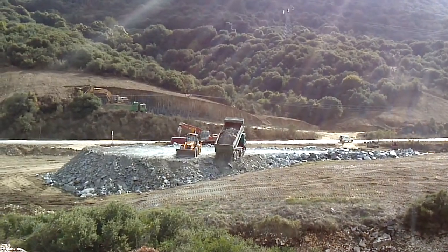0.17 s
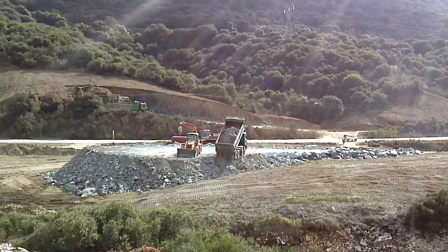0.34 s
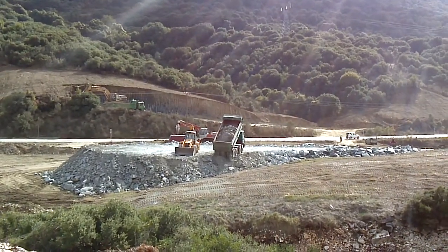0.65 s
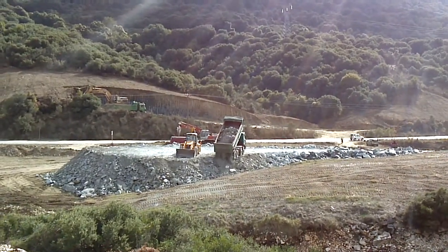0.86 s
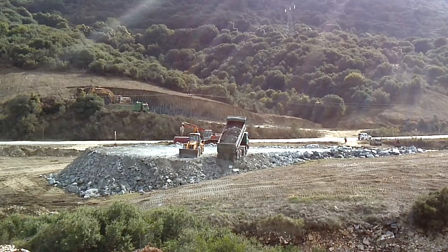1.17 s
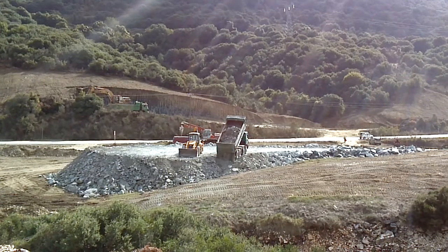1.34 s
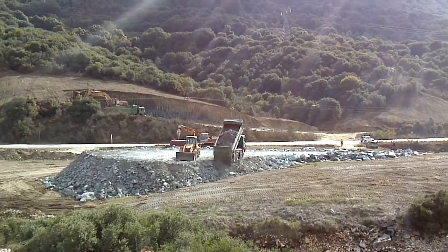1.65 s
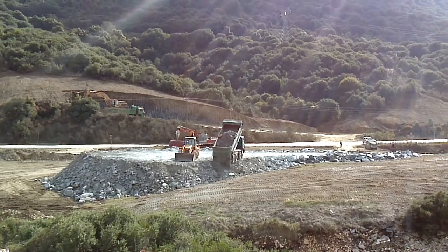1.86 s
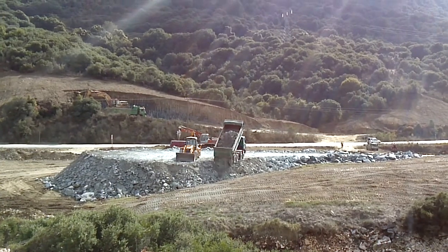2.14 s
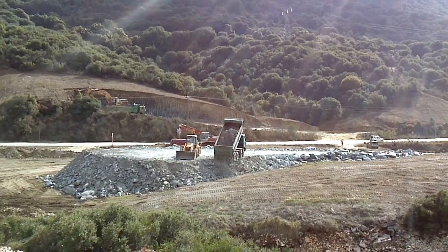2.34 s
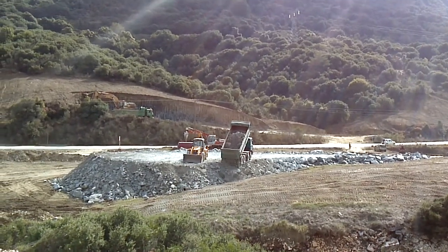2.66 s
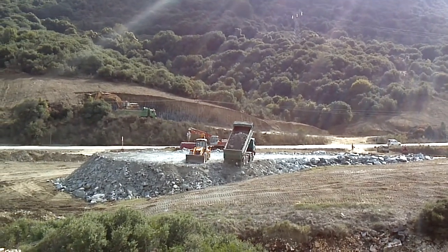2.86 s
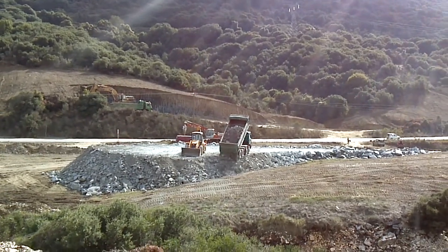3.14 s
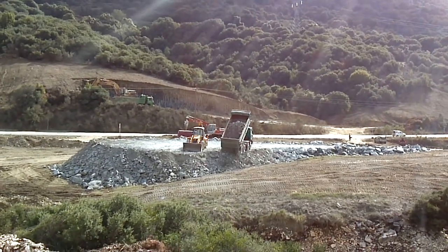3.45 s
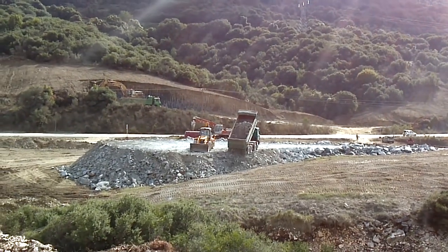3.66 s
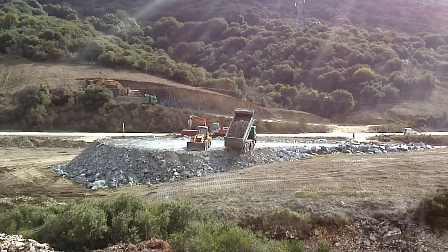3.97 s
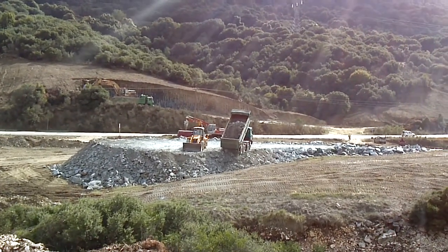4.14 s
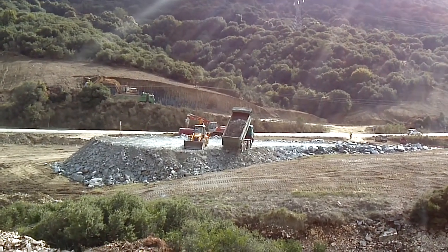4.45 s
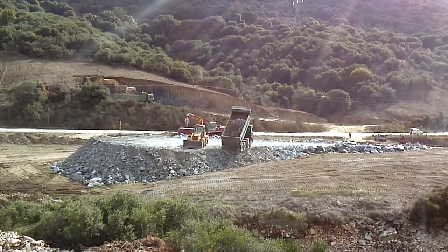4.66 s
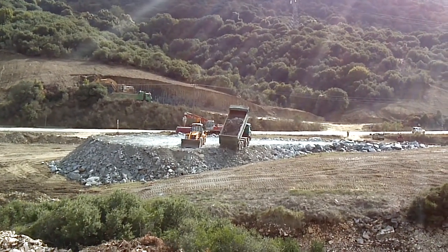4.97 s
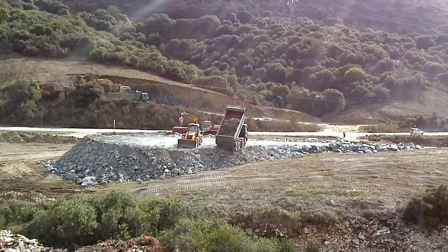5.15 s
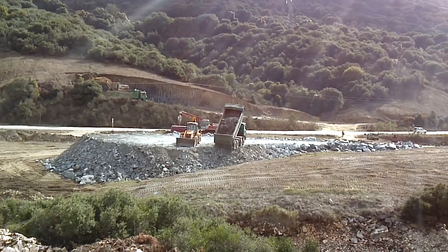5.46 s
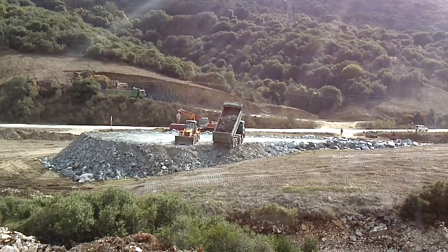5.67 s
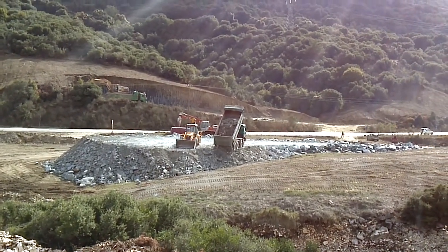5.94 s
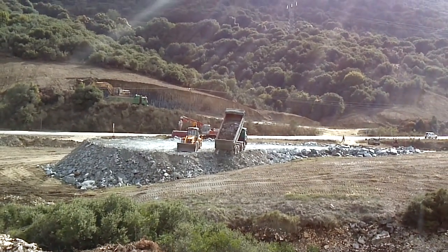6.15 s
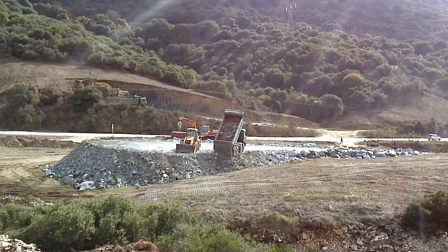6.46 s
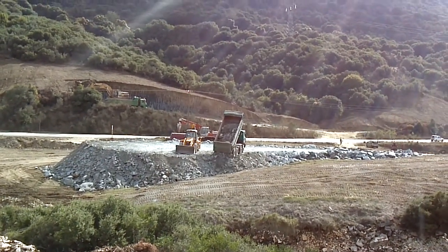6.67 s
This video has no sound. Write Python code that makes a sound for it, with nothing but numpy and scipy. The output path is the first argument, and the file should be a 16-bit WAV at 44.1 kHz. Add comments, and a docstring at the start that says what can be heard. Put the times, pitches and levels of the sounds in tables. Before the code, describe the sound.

Rocks tumble out of a steel truck bed with dull thumps, clanks and sliding gravel while diesel engines rumble far off.

```python
"""Far across a valley diesel machines drone and clatter, and an engine pulls under load as a dump truck
tips rock. The first boulders land within a second, each impact exciting a thud, a clang of the steel tub
and a crack of stone, while gravel slides between them. After three seconds slabs grind down the tub by
stick-slip friction and blocks thump down; then sharper blows set the panels ringing, up to a last heavy
volley. Throughout, the hillside scatters back a faint echo and the whole sound is dull."""
import sys
import numpy as np
from scipy import signal
from scipy.fft import rfft, irfft, next_fast_len
from scipy.io import wavfile
from scipy.ndimage import map_coordinates

SR = 44100
rng = np.random.default_rng(int(sys.argv[2]) if len(sys.argv) > 2 else 0)


def to_wav(s):
    """Save 16-bit WAV."""
    ch = np.atleast_2d(s).T  # columns
    pcm = np.round(np.clip(ch, -1, 1) * 32767)  # PCM
    wavfile.write(sys.argv[1], SR, pcm.astype(np.int16))


N = 300321

# Steady machine tones, the diesel firing rate first. Each row: frequency in Hz, level in dB.
HUM_TONES = [(91.5, -42.5), (112, -39), (183, -43.5), (940, -61.5), (2223, -64.5)]
# An engine under load. Each row: start and end in seconds, first and last firing rate in Hz, level in dB.
ENGINE_PULLS = [(0, 0.964, 214, 222, -32), (1.178, 1.644, 219, 219.7, -31),
                (5.915, 6.186, 238, 208.5, -26.5)]
# Exhaust harmonics. Each row: multiple of the firing rate, relative level in dB.
EXHAUST_HARMONICS = [(1, 4), (2, -25), (3, -13), (4, -32.5)]
# Envelopes of diesel clatter, deep roar and shifting load. Each row: time in seconds, level in dB.
CLATTER_LEVELS = [(0, -46.5), (1.1, -42.5), (2.2, -44), (3.8, -45), (4.6, -43), (6.81, -41)]
ROAR_LEVELS = [(0, -24.5), (0.7, -29.5), (1.4, -22.5), (2.0, -26), (2.7, -21.5), (3.3, -25), (4.2, -25.5),
               (5.5, -26), (6.2, -25), (6.81, -24.5)]
LOAD_LEVELS = [(0.0, -25), (1.14, -29), (1.56, -28), (1.99, -28), (2.5, -25.5), (5.27, -27.5),
               (6.18, -24.5), (6.81, -22)]
# The treble of the whole sound fades above about 5 kHz. Each row: frequency in Hz, gain in dB.
TREBLE_ROLLOFF = [(4600, 0), (7000, -4.5), (8500, -18.5), (15000, -27)]

# Broad spectra of the sources. Each row: frequency in Hz, relative spectral level in dB.
CLATTER_SPECTRUM = [(500, -19.5), (950, 0.5), (1250, -1), (1500, -2), (1950, -5), (2280, 0.5), (2650, -6.5),
                    (3200, -16), (4200, -13), (4700, -22.5), (5300, -37), (8000, -74.5)]
ROAR_SPECTRUM = [(10, -27), (20, 5.5), (32, 8), (48, 2.5), (65, -1), (100, -10.5), (300, -90.5)]
LOAD_SPECTRUM = [(40, -21), (70, -3.5), (95, 3), (115, -2), (145, -6.5), (190, -3.5), (250, -6.5),
                 (330, -12), (600, -22), (2000, -67.5)]
GRAVEL_SPECTRUM = [(150, -17.5), (300, -4.5), (420, 2), (720, 0), (840, -8), (1100, -8.5), (1450, -18),
                   (2400, -18), (3200, -24), (4400, -28.5), (5300, -47.5), (8000, -83.5)]
PEBBLE_SPECTRUM = [(300, -26.5), (800, -5.5), (1300, -2.5), (1800, -7.5), (2500, 0.5), (3300, -8),
                   (4400, -8.5), (5300, -37), (8000, -54)]
SCRAPE_SPECTRUM = [(110, -24), (230, 1), (450, 0.5), (680, -4), (830, -11), (1050, -6.5), (1400, -22),
                   (2400, -20.5), (4000, -36), (5500, -71)]
THUD_SPECTRUM = [(20, -11.5), (40, 2.5), (70, -1.5), (110, 1.5), (190, -2.5), (260, -9), (360, -14),
                 (700, -40), (2000, -81.5)]
CLANG_SPECTRUM = [(120, -33), (280, -4.5), (420, 2), (680, 1), (830, -5), (1050, -4), (1300, -11),
                  (1600, -15), (3000, -53), (6000, -83)]
CRACK_SPECTRUM = [(600, -27.5), (1300, -7.5), (1700, 8.5), (2500, 8.5), (3200, -2), (4200, -8.5),
                  (4700, -14.5), (5400, -44.5), (8000, -46)]
SNAP_SPECTRUM = [(2000, -26), (6000, 3.5), (7500, -3.5), (9000, -7), (15000, -21.5)]
ECHO_SPECTRUM = [(200, -4.5), (1000, -2.0), (5000, -18.0)]
# A small stone's click. Each row: multiple of its ring frequency, relative spectral level in dB.
CHIP_SPECTRUM = [(.2, -31.5), (0.501, -2), (0.801, -7.5), (1.049, -11), (1.152, -14.5), (1.299, -30),
                 (1.7, -40), (2.401, -73)]
# Resonances of the steel tub. Each row: frequency in Hz, bandwidth in Hz, lift in dB.
TUB_MODES = [(245, 61, 9), (336, 22, 6), (451, 18, 3.5), (498, 5.5, 5.5), (619, 13, 3.5), (720, 12, 6.5),
             (943, 16, 5.5), (1040, 9.5, 7.5), (1145, 34, 4.5), (1270, 49, 4.5), (1623, 20, 6),
             (1884, 17, 3.5), (2278, 65, 8), (2865, 55, 3)]

# Small hard stones on steel. Each row: start in seconds, level in dB, length in seconds,
# snap of the fracture relative to the click in dB.
CHIP_HITS = [(0.379, -39, 0.17, -23.5), (0.586, -40, .07, -35), (0.726, -37, 0.15, -24),
             (1.75, -37, 0.081, -16.5), (2.332, -48.5, 0.052, -10), (2.491, -41.5, .07, -36),
             (3.296, -35, 0.049, -37), (3.389, -41, .07, -35.5), (3.483, -31.5, 0.059, -39.5),
             (3.573, -39, 0.051, -5), (4.774, -28, 0.056, -23.5), (4.875, -36.5, 0.091, -36.5),
             (5.122, -31.5, 0.065, -14.5), (5.62, -45.5, 0.14, -41), (6.277, -44, 0.091, -8),
             (6.541, -30.5, 0.11, -11), (6.581, -36.5, 0.074, -11)]
# Slabs grinding down the tub. Each row: start and length in seconds, level in dB, pitch in Hz.
SLAB_SCRAPES = [(3.07, .22, -28.5, 400), (3.3, .27, -28.5, 460), (3.549, .12, -29.5, 680),
                (6.42, .08, -23.5, 660)]
# Rock corners on panels. Each row: start in seconds, level in dB, pitch in Hz, 60 dB decay in seconds.
PANEL_HITS = [(1.712, -17.5, 618, 0.21), (2.087, -19.5, 610, 0.095), (2.339, -18.5, 609, 0.21),
              (2.427, -23, 620, 0.11), (2.466, -12.5, 179, 0.26), (2.467, -18.5, 515, .2),
              (2.745, -21, 600, 0.19), (3.13, -23.5, 432, .4), (3.35, -25.5, 450.7, 1),
              (3.378, -26, 985, 0.24), (3.487, -15.5, 246, 0.24), (3.487, -29.5, 445, 0.32),
              (3.487, -23.5, 1040, 0.18), (4.78, -19.5, 1021, 0.1), (4.779, -23, 903, 0.18),
              (4.78, -23, 720, 0.19), (4.856, -21.5, 1056, .16), (4.88, -16.5, 718, 0.33),
              (4.88, -20, 896, 0.095), (4.88, -12.5, 544, 0.13), (4.88, -27, 1127, 0.18),
              (5.128, -25, 1620, 0.15), (5.128, -17, 476, 0.15), (5.128, -14.5, 634, 0.098),
              (5.128, -31.5, 2191, .2), (5.128, -27.5, 2865, 0.069), (5.15, -28, 1244, .25),
              (5.607, -14, 690, 0.072), (5.61, -20, 185, 0.32), (5.622, -13.5, 330, 0.11),
              (5.884, -15.5, 264, .13), (5.9, -21.5, 619, 0.27), (5.89, -23.5, 944, .24),
              (6.607, -16.5, 2288, 0.096), (6.607, -25, 2865, 0.062), (6.607, -30, 1884, .12),
              (6.609, -21, 697, 0.2), (6.609, -25.5, 1141, 0.25), (6.609, -16, 338, 0.17)]
# Heavy blocks landing. Each row: start in seconds, level in dB, pitch in Hz.
BLOCK_LANDINGS = [(1.754, -15.5, 160), (2.387, -6, 72), (2.415, -10.5, 95), (2.459, -4, 150),
                  (3.677, -11, 41.6), (3.741, -6, 120), (3.922, -6.5, 70), (3.941, -7, 116),
                  (3.996, -2, 166), (4.025, -16, 148), (4.051, -13, 92), (4.069, -8, 140),
                  (4.262, -13, 130), (5.606, -3.5, 140), (5.648, -9.5, 64.6), (5.986, -9, 65.6),
                  (6.384, -0.5, 135), (6.584, -1, 98), (6.611, 1, 240), (6.625, -6.5, 130),
                  (6.667, -5, 171)]
# Boulders landing. Each row: start in seconds, level in dB, knock pitch in Hz, tumble length in seconds,
# crack relative to the clang in dB, rise time in seconds.
BOULDER_BLOWS = [(0.335, -31.5, 700, .2, -6, .01), (0.372, -23, 1025, 0.24, -13, .009),
                 (0.577, -22.5, 860, 0.25, -12.5, 0.0031), (1.37, -21, 110, 0.22, -7.5, 0.0048),
                 (1.585, -23, 630, 0.14, -30, 0.00046), (1.627, -25, 680, 0.16, -17, 0.0005),
                 (1.63, -21.5, 118, 0.31, -15, 0.027), (1.695, -20, 610, 0.23, -15.5, 0.012),
                 (1.752, -18, 175, .13, -15, 0.0012), (2.082, -27.5, 600, 0.094, -25, 0.002),
                 (2.338, -21, 600, 0.28, -15, 0.0005), (2.385, -20.5, 390, 0.14, -15, .001),
                 (2.424, -17, 620, .13, -16, 0.001), (2.462, -12.5, 235, 0.17, -14, 0.0005),
                 (2.575, -20, 199, 0.42, -12, 0.034), (2.674, -12, 205, 0.34, -11, 0.0053),
                 (2.69, -14.5, 330, 0.16, -15, 0.0024), (2.716, -13.5, 414, 0.24, -16, 0.0095),
                 (3.08, -25, 317, 0.28, -25.5, 0.012), (3.121, -23.5, 500, 0.22, -29.5, .0005),
                 (3.243, -18.5, 290, 0.22, -19.5, 0.0025), (3.336, -19, 200, 0.44, -18, 0.022),
                 (3.374, -21, 1000, 0.17, -10, 0.0004), (3.485, -19, 200, 0.23, -8.5, 0.00038),
                 (3.576, -20, 960, 0.11, -9, 0.0004), (3.735, -23.5, 116, 0.27, -16.5, 0.0057),
                 (3.778, -30, 211, .15, -26, .004), (3.922, -24.5, 330, 0.1, -23.5, 0.00087),
                 (3.951, -30.5, 1110, 0.045, -16, .0005), (3.99, -21, 173, .2, -22, 0.0032),
                 (4.053, -23.5, 161, 0.12, -18, .003), (4.145, -38.5, 1420, 0.17, 6, 0.0037),
                 (4.25, -24, 131, 0.33, -21.5, 0.018), (4.746, -27.5, 890, 0.088, -5, 0.006),
                 (4.779, -16, 960, 0.18, -14.5, 0.00061), (4.853, -16, 757, .16, -12, 0.0012),
                 (4.879, -16.5, 605, 0.21, -18.5, 0.00038), (5.008, -20.5, 198, 0.21, -26.5, .002),
                 (5.124, -13.5, 473, 0.19, -13.5, 0.0026), (5.307, -22, 215, 0.11, -31.5, 0.0016),
                 (5.342, -23.5, 880, 0.24, -13.5, 0.0011), (5.604, -13.5, 214, 0.19, -9.5, 0.0011),
                 (5.622, -16, 450, 0.19, -18, 0.001), (5.883, -16, 400, 0.31, -16.5, 0.0035),
                 (5.936, -21, 182, .12, -15.5, .002), (6.142, -22, 336, 0.37, -6.5, .0005),
                 (6.215, -17, 180, 0.4, -12.5, 0.0051), (6.384, -17, 280, 0.27, -18, 0.00046),
                 (6.437, -16.5, 260, 0.25, -17, 0.0022), (6.584, -16.5, 780, 0.14, -11, 0.00047),
                 (6.605, -14, 440, 0.2, -14, 0.001), (6.729, -35, 181, 0.22, -22, 0.004)]


def amp(db):
    """Amplitude ratio of a level in decibels."""
    return 10 ** (np.asarray(db) / 20)


def rms(x):
    """Root mean square: the effective amplitude."""
    return np.sqrt(np.mean(x ** 2) + 1e-20)


def unit(x):
    """Normalisation to rms 1."""
    return x / rms(x)


def envelope(points):
    """Linear interpolation of (seconds, value) points at every sample."""
    return np.interp(np.arange(N) / SR, *np.transpose(points))


def wobble(knots_per_s):
    """Slow random modulation: a spline through Gaussian values."""
    coarse = np.arange(0, N + 100, 100)
    knots = rng.standard_normal(int(N * knots_per_s / SR) + 4)
    return np.interp(np.arange(N), coarse, map_coordinates(knots, [coarse * knots_per_s / SR]))


def phase(hz):
    """Phase in radians is the running integral of frequency."""
    return 2 * np.pi * np.cumsum(hz) / SR


def decaying(energy, decay_s):
    """Leaky integration: each input of energy dies away exponentially."""
    return signal.lfilter([1], [1, -np.exp(-1 / (decay_s * SR))], energy)


def coloured(x, spectrum, modes=()):
    """Minimum-phase filtering by a broad spectrum with resonance peaks standing on it."""
    size = 2 * next_fast_len(len(x) // 2 + 4096)
    hz = np.fft.rfftfreq(size, 1 / SR)
    knot_hz, knot_db = np.transpose(spectrum)
    db = np.interp(np.log(hz + 1), np.log(knot_hz + 1), knot_db)
    db += sum(lift / (1 + (2 * (hz - centre) / width) ** 2) for centre, width, lift in modes)
    cepstrum = irfft(np.log(amp(db)), size)
    cepstrum[1:size // 2] *= 2  # folded onto positive time, so ringing follows its cause
    cepstrum[size // 2 + 1:] = 0
    return irfft(rfft(x, size) * np.exp(rfft(cepstrum)), size)[:len(x)]


def contacts(size, per_s, scatter_db):
    """A Poisson process: randomly timed impulses of scattered strength, rms 1."""
    touch = rng.random(size) < per_s / SR
    return unit(touch * rng.choice([-1, 1], size) * amp(scatter_db * rng.standard_normal(size)))


def tumble(t, t60, per_s, first, rise_s):
    """Impact excitation: one sharp contact, then a shower of smaller ones that builds and decays."""
    fade = amp(-60 * t / t60) * (1 - np.exp(-t / rise_s))
    shower = unit(contacts(len(t), per_s, scatter_db=2.5) * fade)
    return shower + first * unit(1. * (t == 0))


def machines(waver_db=1.16):
    """Amplitude modulation: diesels hum and clatter at the firing rate, wavering in the moving air."""
    hum = sum(amp(db + 2.2 * wobble(7.3)) * unit(np.sin(phase(hz + 2.71 * wobble(14))))
              for hz, db in HUM_TONES)
    firing = np.cos(phase(HUM_TONES[0][0] * (1 + 0.011 * wobble(5.4))))
    clatter = unit(coloured(rng.standard_normal(N) * amp(0.54 * firing), CLATTER_SPECTRUM))
    return hum + clatter * amp(envelope(CLATTER_LEVELS) + waver_db * (wobble(4.35) + wobble(13)))


def pulling_engine(attack_s=0.042, release_s=0.055):
    """Periodic exhaust pulses form a harmonic series that swells under load and glides with speed."""
    out, t = np.zeros(N), np.arange(N) / SR
    for start, end, first_hz, last_hz, db in ENGINE_PULLS:
        firing_hz = np.interp(t, [start, end], [first_hz, last_hz])
        cycle = phase(firing_hz * (1 + 0.0051 * wobble(21)))
        note = sum(amp(level + 0.73 * wobble(9.4)) * np.sin(k * cycle) for k, level in EXHAUST_HARMONICS)
        effort = np.clip(np.minimum((t - start) / attack_s, (end - t) / release_s), 0, 1)
        out += unit(note) * amp(db) * effort
    return out


def rumble():
    """Low-frequency noise: the shifting load and heavy machines rumble over a slowly swelling roar."""
    load = unit(coloured(contacts(N, per_s=900, scatter_db=4.0), LOAD_SPECTRUM))
    load *= amp(envelope(LOAD_LEVELS) - 2.5 + 1.4 * wobble(12))
    roar = unit(coloured(rng.standard_normal(N + SR), ROAR_SPECTRUM)[SR:])
    roar *= amp(envelope(ROAR_LEVELS) + 1.5 * wobble(7.1))
    return load + roar


def hillside(x, t60, rise_s):
    """Diffuse scattering: scrub on the slopes returns a dull, late echo."""
    t = np.arange(SR) / SR
    scatter = rng.standard_normal(SR) * amp(-60 * t / t60) * (1 - np.exp(-t / rise_s))
    tail = coloured(scatter, ECHO_SPECTRUM)
    return signal.fftconvolve(x, tail / np.linalg.norm(tail))[:N]


def heft(knock_hz, even_hz=400, db_per_octave=9):
    """Energy partition into (thud, clang) gains: big, low-pitched rocks thud, small ones clang."""
    ratio = amp(db_per_octave * np.log2(even_hz / knock_hz))
    return ratio / np.hypot(1, ratio), 1 / np.hypot(1, ratio)


def stone_flow(trickle_db=-38, drag_db=-21, settle_s=0.25):
    """Incoherent sources add in power: a steady trickle plus the stones each blow shakes loose."""
    jolts = np.zeros(N)
    for start, db, knock_hz, *_ in BOULDER_BLOWS:
        _, clang_gain = heft(knock_hz)
        jolts[round(start * SR)] = (amp(db + drag_db) * clang_gain) ** 2
    return np.sqrt(amp(trickle_db) ** 2 + decaying(jolts, settle_s))


def sliding_gravel():
    """Shot noise: countless small contacts excite the tub, whose modes the load damps."""
    grains = contacts(N, per_s=1400, scatter_db=1.0) * amp(0.3 * wobble(22))
    damped = [(hz, width, 0.48 * lift) for hz, width, lift in TUB_MODES]
    return stone_flow() * unit(coloured(grains, GRAVEL_SPECTRUM, damped))


def pebbles(skip_s=0.0041, relative_db=-14.5):
    """Each pebble dissipates its energy in a brief skitter on the heap, louder when more stone runs."""
    landings = contacts(N, per_s=31, scatter_db=2.0) ** 2
    skitter = np.sqrt(decaying(landings, skip_s)) * contacts(N, per_s=3000, scatter_db=1.0)
    ticks = coloured(skitter, PEBBLE_SPECTRUM, TUB_MODES)
    return amp(relative_db) * stone_flow() * unit(ticks)


def chips(centre_hz=4150, width_hz=390):
    """Brittle fracture and resonance: small stones snap and skip, each with one bright ring."""
    out, t = np.zeros(N + SR), np.arange(SR // 5) / SR
    for start, db, length, snap_db in CHIP_HITS:
        ring_hz = centre_hz * (1 + 0.012 * rng.standard_normal())
        spectrum = [(k * ring_hz, level) for k, level in CHIP_SPECTRUM]
        skips = tumble(t, length, per_s=1100, first=0.41, rise_s=0.0033)
        click = unit(coloured(skips, spectrum, [(ring_hz, width_hz, 10)]))
        snap = unit(coloured(tumble(t, t60=0.092, per_s=3000, first=0.17, rise_s=0.0028), SNAP_SPECTRUM))
        gain = amp(db) * rms(amp(-60 * t / length))
        out[round(start * SR):][:len(t)] += gain * (click + amp(snap_db) * snap)
    return out[:N]


def slab_scrapes(fade_s=0.04):
    """Stick-slip friction: a slab drives the tub's modes for as long as it moves."""
    out, t = np.zeros(N + SR), np.arange(SR // 2) / SR
    for start, length, db, grind_hz in SLAB_SCRAPES:
        pressure = np.clip(np.minimum(t, length - t) / fade_s, 0, 1)
        slips = contacts(len(t), per_s=670, scatter_db=1.0)
        grind = coloured(slips, SCRAPE_SPECTRUM, TUB_MODES + [(grind_hz, .25 * grind_hz, 4)])
        out[round(start * SR):][:len(t)] += amp(db) * pressure * unit(grind)
    return out[:N]


def panel_clanks(attack_s=0.0023, waver_hz=3.6):
    """Free vibration: a struck panel rings on, its pitch unsteady under the moving load."""
    out, t = np.zeros(N + SR), np.arange(SR) / SR
    for start, db, hz, t60 in PANEL_HITS:
        ring = np.sin(phase(hz + waver_hz * wobble(70)[:SR]))
        out[round(start * SR):][:SR] += amp(db - 60 * t / t60) * (1 - np.exp(-t / attack_s)) * ring
    return out[:N]


def block_thumps(decay_cycles=0.61, attack_s=0.00068):
    """Heavily damped oscillation: ground or truck yields to a block and swings for a cycle or two."""
    out, t = np.zeros(N + SR), np.arange(SR // 4) / SR
    for start, db, hz in BLOCK_LANDINGS:
        swing = (1 - np.exp(-t / attack_s)) * np.exp(-t * hz / decay_cycles)
        out[round(start * SR):][:len(t)] -= amp(db) * swing * np.sin(2 * np.pi * hz * t)
    return out[:N]


def struck_tub(scatter_db=2.5):
    """Mode excitation depends on the spot that is hit: some resonances gain, others are muted."""
    return [(hz, width, lift + scatter_db * rng.standard_normal()) for hz, width, lift in TUB_MODES]


def topples(delay_share=.1, relative_db=-5, pitch_ratio=1.2):
    """Secondary impact: each boulder tips onto an edge for a lighter, higher blow."""
    return [(start + delay_share * length, db + relative_db, hz * pitch_ratio, length, crack_db, rise_s)
            for start, db, hz, length, crack_db, rise_s in BOULDER_BLOWS]


def boulders(soft_landing_s=0.008):
    """Impacts drive resonators: each boulder shakes the truck, rings the tub and splinters on stone."""
    out, t = np.zeros(N + SR), np.arange(SR // 3) / SR
    end_fade = 1 - (t / t[-1]) ** 10
    for start, db, knock_hz, length, crack_db, rise_s in BOULDER_BLOWS + topples():
        hollow_db = -0.5 * crack_db  # a rock that stays whole knocks hollower
        modes = struck_tub() + [(knock_hz, 0.32 * knock_hz, hollow_db)]
        sharp = np.exp(-rise_s / soft_landing_s)  # a slow build-up softens the first contact
        thud_force = tumble(t, 0.97 * length, per_s=900, first=0.66 * sharp, rise_s=rise_s)
        clang_force = tumble(t, length, per_s=1100, first=0.45 * sharp, rise_s=rise_s)
        crack_force = tumble(t, length, per_s=1200, first=0.076 * sharp, rise_s=rise_s)
        thud = unit(coloured(thud_force, THUD_SPECTRUM, modes))
        clang = unit(coloured(clang_force, CLANG_SPECTRUM, modes))
        crack = unit(coloured(crack_force, CRACK_SPECTRUM, TUB_MODES))
        thud_gain, clang_gain = heft(knock_hz)
        blow = thud_gain * thud + clang_gain * (clang + amp(crack_db) * crack)
        gain = amp(db) * rms(amp(-60 * t / length))  # a longer tumble carries more energy
        out[round(start * SR):][:len(t)] += gain * blow * end_fade
    return out[:N]


def scene():
    """Superposition: rock, its echo and the machines add, the treble fading above about 5 kHz."""
    rock = boulders() + slab_scrapes() + panel_clanks() + chips() + pebbles() + block_thumps()
    echo = amp(-20.5) * hillside(rock, t60=0.75, rise_s=0.027)
    mix = rock + echo + sliding_gravel() + rumble() + pulling_engine() + machines()
    return coloured(mix, TREBLE_ROLLOFF)[None]


def record(dry):
    """Band limiting: a steep low-pass removes the highest treble."""
    cutoff_hz = 15700
    size = next_fast_len(N + SR // 2)
    hz = np.fft.rfftfreq(size, 1 / SR)
    return irfft(rfft(dry, size) / np.sqrt(1 + (hz / cutoff_hz) ** 40), size)[..., :N]


dry = scene()
out = record(dry)
to_wav(out)
```